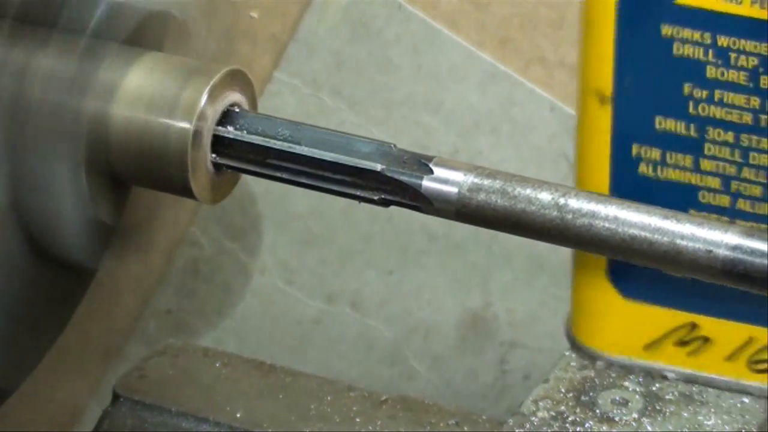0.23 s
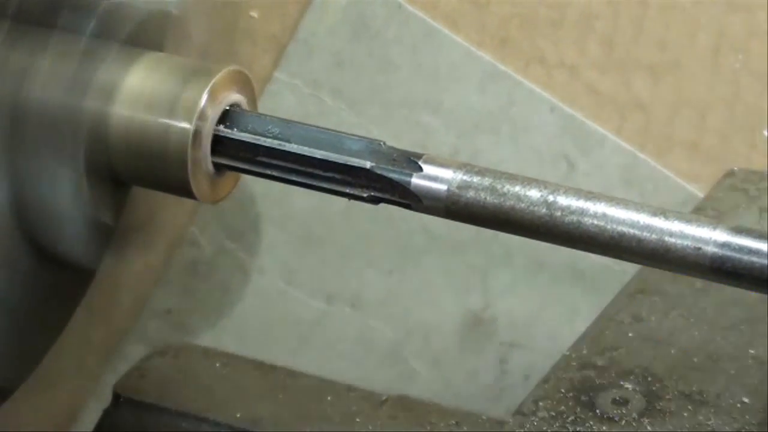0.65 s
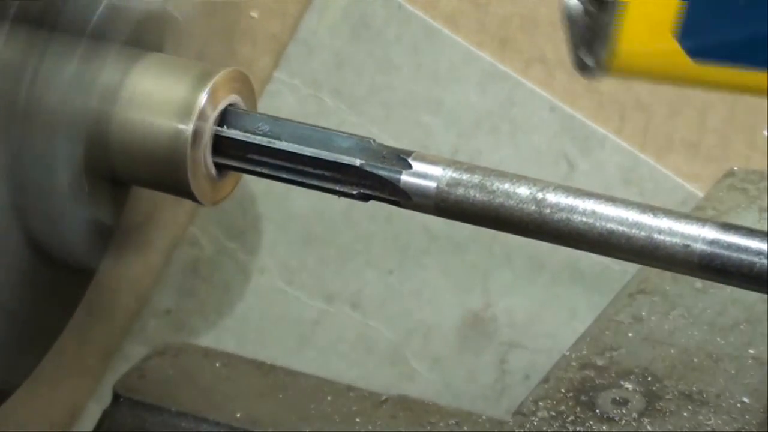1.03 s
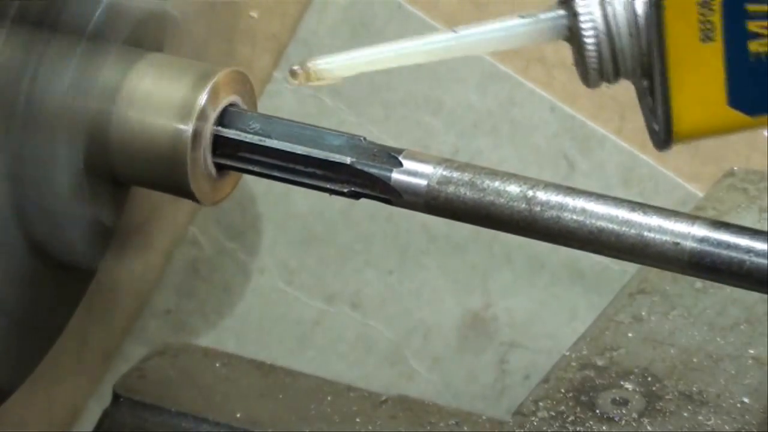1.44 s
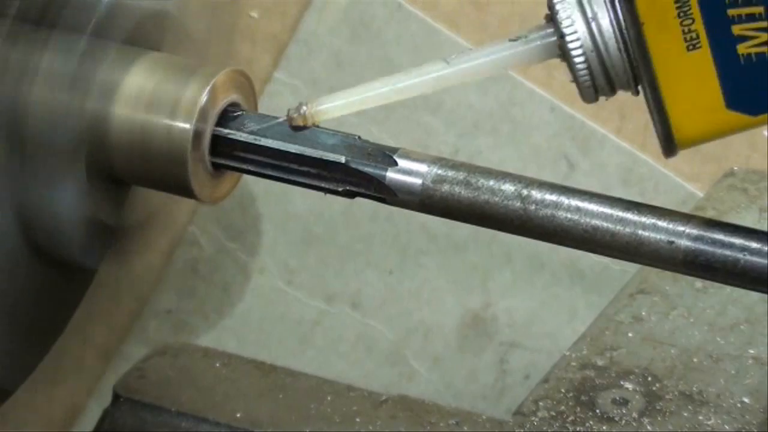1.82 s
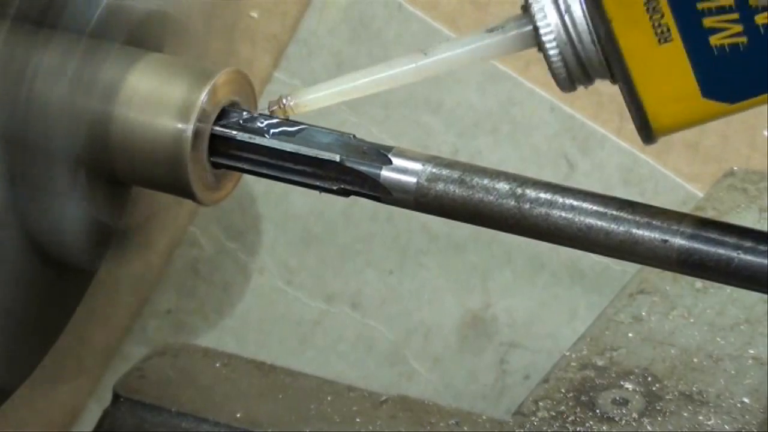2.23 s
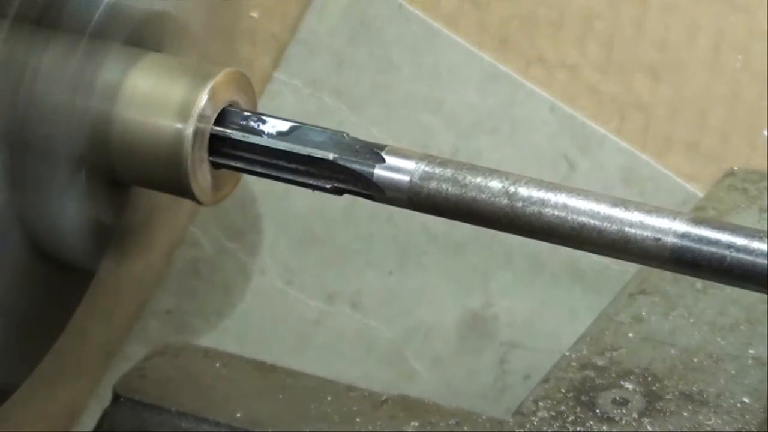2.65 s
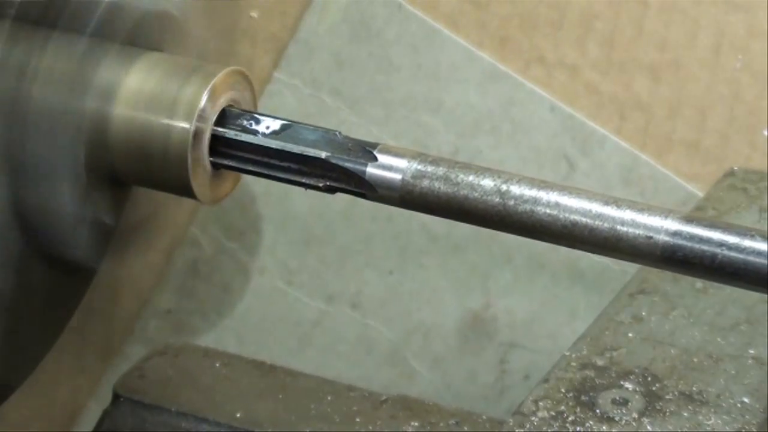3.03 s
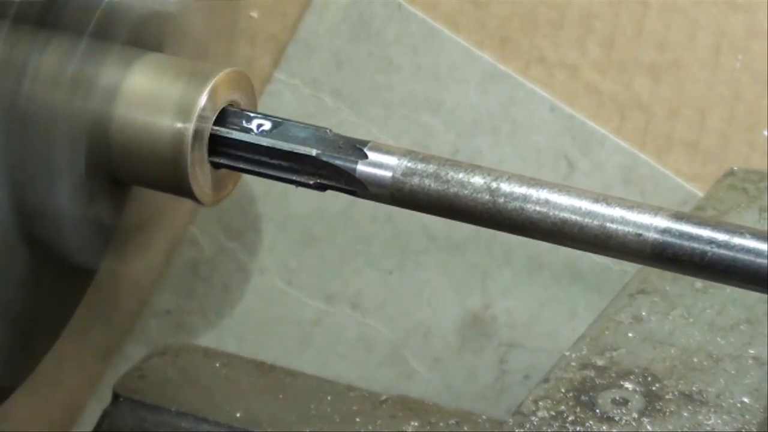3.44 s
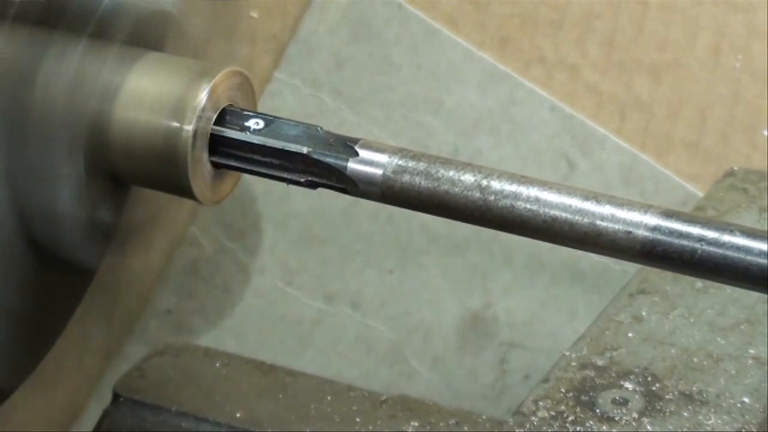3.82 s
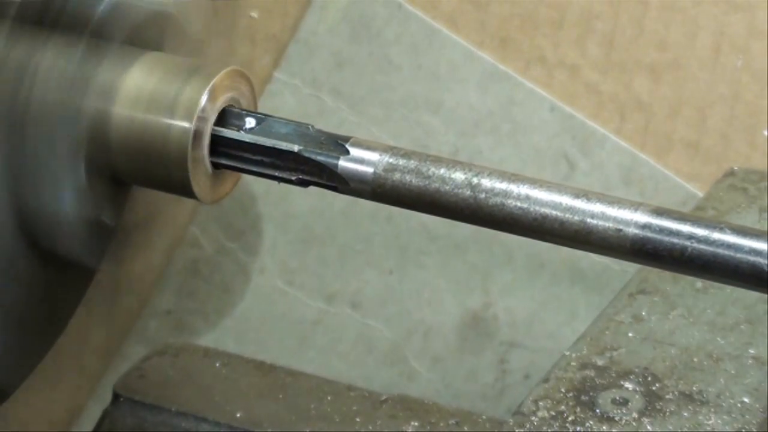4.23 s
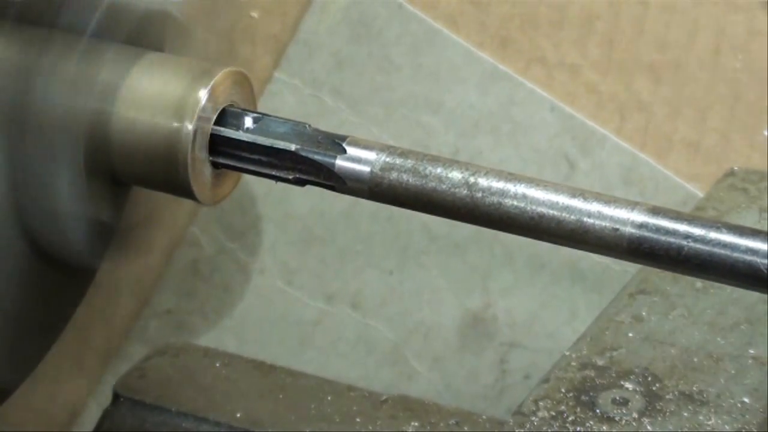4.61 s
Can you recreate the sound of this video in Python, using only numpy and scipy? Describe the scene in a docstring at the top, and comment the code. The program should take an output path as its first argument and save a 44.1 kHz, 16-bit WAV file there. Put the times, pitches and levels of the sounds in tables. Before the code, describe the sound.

Steady lathe hum and soft high scraping open the scene, with one small metal tick just before the cut. The reamer suddenly grips the brass and shrieks, a gritty whistle near four kilohertz with bright overtones and hissing friction. It falters and relocks repeatedly, fluttering with the rotation. Close stereo microphone, short dull room tail, motor slightly left, and the hum ducks beneath the squeal.

```python
"""In a workshop a lathe hums; a fluted reamer, at first only brushing a spinning brass bushing, bites and chatters.
The drive is a sum of gear tones, mains hum and shaped noise; load slows its shaft a little.
The scrape is friction noise exciting the modes of tool and bushing; a small metal tick is a few decaying modes.
The chatter is a self-excited rough tone near 4 kHz with two overtones; it sinks as the tool goes deeper.
A short room tail follows every sound, and the recorder turns its gain down as the sound grows."""
import sys
import numpy as np
from scipy import signal
from scipy.fft import rfft, irfft
from scipy.io import wavfile
from scipy.ndimage import uniform_filter1d

SR = 44100
rng = np.random.default_rng(int(sys.argv[2]) if len(sys.argv) > 2 else 0)


def waveform_to_disk(signal):
    """Save audio, clipped to [-1, 1], as 16-bit WAV at the path in sys.argv[1]."""
    frames = np.transpose(np.atleast_2d(signal))
    scaled = np.clip(frames, -1, 1) * 32767
    samples = np.round(scaled).astype(np.int16)
    wavfile.write(sys.argv[1], SR, samples)


def decibels_to_gain(level_db):
    """Convert a level in decibels to a linear amplitude gain (20 dB per decade)."""
    exponent = np.asarray(level_db, float) / 20
    return 10 ** exponent


N = 214712   # length [samples]
BITE_S = 1.386


def seconds():
    """Uniform sampling: the time of every sample in seconds."""
    return np.arange(N) / SR


def rms_one(x):
    """Normalization: scale a signal to unit mean power."""
    return x / np.sqrt(np.mean(x ** 2) + 1e-20)


def in_time(rows):
    """Linear interpolation: the columns of a table as curves over all samples."""
    times, *columns = np.transpose(rows)
    return [np.interp(seconds(), times, column) for column in columns]


def at_hz(points, hz):
    """Logarithmic frequency scale: a spectrum is interpolated along it."""
    hz_of, value = np.transpose(points)
    return np.interp(np.log(hz + 1), np.log(hz_of + 1), value)


def drift(rate_hz):
    """Low-passed random process: noise twice through a one-pole filter, run in for a second, unit rms."""
    r = np.exp(-2 * np.pi * rate_hz / SR)
    slow = signal.lfilter([1], [1, -2 * r, r * r], rng.standard_normal(N + SR))
    return rms_one(slow[SR:])


def resonate(x, hz, width_hz):
    """Resonance: a damped two-pole oscillator with unit gain at its peak."""
    r = np.exp(-np.pi * width_hz / SR)
    poles = [1, -2 * r * np.cos(2 * np.pi * hz / SR), r * r]
    return signal.lfilter([(1 - r * r) / 2, 0, (r * r - 1) / 2], poles, x)


def since_bite():
    """Origin of time for the cut: seconds since the reamer bit, zero before."""
    return np.maximum(seconds() - BITE_S, 0)


def engaged(takes_s=0.026):
    """Onset of contact: 0 while the flutes brush the bore, 1 once they cut."""
    return np.clip((seconds() - BITE_S) / takes_s + 1, 0, 1)


def by_spell(values, between):
    """Mode locking: one value in each spell, another between them, blended over the locking time."""
    lock_s = 0.04
    out = np.full(N, float(between))
    for (start, end, *_), value in zip(SPELLS, values):
        out[int(start * SR):int(end * SR)] = value
    return uniform_filter1d(out, int(lock_s * SR))


def last_squeal():
    """Relaxation: time since the last squeal began, in settling times; negative before."""
    settles_s = 0.32
    return (seconds() - SPELLS[-1][0]) / settles_s


# gear and belt tones as multiples of the shaft speed; whole multiples add up to one knock a turn
GEAR_MULTIPLES = [10, 15, 16.8, 20, 23.2, 25.33, 28.35, 28, 30, 30.5, 39, 46.7, 50, 53, 54, 55, 56, 57, 58,
                  59, 60, 63.3, 77, 106, 115, 116, 148.6]
# level of each gear tone while the lathe idles: (level [dB])
GEARS_IDLE_DB = [-46, -44, -40.5, -42.5, -38, -32, -26.5, -38, -41, -28, -35.5, -53, -57, -31, -31.5, -33,
                 -32, -37, -29, -31.5, -54, -51, -34.5, -38.5, -46, -36.5, -38]
# level of each gear tone under load: (level [dB])
GEARS_LOADED_DB = [-45.5, -44, -46, -40.5, -38, -47, -43.5, -45, -31.5, -34, -34, -74, -80, -33, -52, -26,
                   -36, -30, -32, -31.5, -34.5, -52, -33.5, -37, -76, -44, -38]
# motor hum: (frequency [Hz], level [dB])
MAINS_HUM = [(120, -36), (240, -33)]
# spectral shape of the drive noise: (frequency [Hz], relative density [dB per Hz])
RUMBLE_SHAPE = [(24, -68), (40, -35.5), (101, -22.5), (166, -13.5), (241, 2), (325, -10), (509, -4.5),
                (606, -8.5), (881, -14), (1050, -10), (1220, -15), (1860, -13.5), (5170, -28.5),
                (8110, -25.5), (15500, -90)]
# level difference of the drive: (frequency [Hz], left over right [dB])
DRIVE_BALANCE = [(60, 2), (180, 1.5), (550, 3.5), (1650, 1.5), (4970, 2.5), (15000, -1)]
# phase difference of the drive: (frequency [Hz], left lead [rad])
DRIVE_LEAD = [(0, 0), (520, 0.4), (1380, 0.27), (2930, 0.00033), (8440, 0.45), (15400, -0.0)]


def drive(load, waver_db=2.0, patchy_db=0.5, knock_at_turn=.62):
    """Harmonic synthesis: gear tones slow under load, mains hum stays, bearing and belt noise lies under them."""
    idle_hz, loaded_hz = 9.014, 8.964   # shaft speed
    noise_db = -19
    turns = np.cumsum(idle_hz + load * (loaded_hz - idle_hz)) / SR - knock_at_turn
    wavers = [drift(3.5) for _ in range(4)]   # shared among the gear tones
    tones = 0
    for k, (multiple, idle_db, loaded_db) in enumerate(zip(GEAR_MULTIPLES, GEARS_IDLE_DB, GEARS_LOADED_DB)):
        level_db = idle_db + load * (loaded_db - idle_db) + waver_db * wavers[k % 4]
        phase = 2 * np.pi * multiple * turns + 0.66 * wavers[k % 3 + 1]
        tones = tones + decibels_to_gain(level_db) * np.cos(phase)
    for hum_hz, hum_db in MAINS_HUM:
        tones = tones + decibels_to_gain(hum_db) * np.sin(2 * np.pi * hum_hz * seconds())
    hz = np.arange(N // 2 + 1) * SR / N
    noise = irfft(rfft(rng.standard_normal(N)) * decibels_to_gain(at_hz(RUMBLE_SHAPE, hz)), N)
    noise = decibels_to_gain(noise_db + patchy_db * drift(8.0)) * rms_one(noise)
    spectrum = rfft(np.sqrt(2) * tones + noise)
    # the headstock stands to the left
    to_left = decibels_to_gain(at_hz(DRIVE_BALANCE, hz) / 2) * np.exp(.5j * at_hz(DRIVE_LEAD, hz))
    return irfft(np.array([spectrum * to_left, spectrum / to_left]), N)


# the bore is out of round, the grip swings: (times per turn, depth [0-1], phase [rad])
RUNOUT = [(2, 0.02, 2), (3, 0.08, -1.05), (6, 0.09, 1), (7, 0.07, 0.6), (9, 0.05, -1), (10, 0.02, 0.48)]


def grip():
    """Periodic modulation: the cutting force swings with the angle of the spindle."""
    spindle_hz = 9.19
    angle = 2 * np.pi * spindle_hz * seconds()
    return 1 + sum(depth * np.cos(times * angle + phase) for times, depth, phase in RUNOUT)


# modes of tool and bushing: (frequency [Hz], width [Hz], relative level brushing [dB], and cutting [dB])
TOOL_MODES = [(2070, 80, -10, -16), (2670, 80, -10, -11), (2845, 60, -12, -12), (3240, 140, -10, -11),
              (3550, 500, -14, -13), (3785, 45, -10, 1.5), (4150, 200, -8, -2), (5630, 130, -15, -7),
              (5880, 100, -20, -16), (6920, 120, 0, 0), (7200, 250, -6, -7), (7530, 200, -6, -4),
              (7950, 300, -12, -5), (8380, 250, -3, -5), (8800, 200, -14, -3), (9140, 90, -18, 0),
              (9480, 250, -12, -2), (9800, 300, 0, -1), (10550, 300, -3, -13), (10950, 250, -5, -5),
              (11300, 350, 0, 0), (12250, 500, -12, -6), (12900, 250, -14, -12), (13550, 110, -18, -11),
              (13980, 260, -16, -7), (14600, 300, -15, -22), (15650, 200, -17, -20)]
# bands that gather the modes into six groups: (low edge [Hz], high edge [Hz])
GROUP_EDGES = ((900, 4750), (5250, 6150), (6780, 8700), (8700, 10050), (10300, 13250), (13300, 17000))
# the groups, low to high: (level brushing [dB], level cutting [dB], share of pressure [dB per dB],
# gain in a spell [dB], gain with depth [dB per s], gain once the last squeal has settled [dB])
GROUP_RESPONSE = [(-38, -23.5, 0.83, -1.5, 1.43, -6), (-45, -33.5, 0.51, -0.1, 0.14, -4),
                  (-40.5, -24.5, 1.74, 2, 0.4, 2), (-43, -25, 0.94, 4, -2, -5),
                  (-47.5, -37, 1.4, 5, 0.7, 4), (-56, -44.5, 1.2, 5.5, -2, 0)]
# pressure of the flutes on the bore: (time [s], level [dB])
PRESSURE = [(0, 1.5), (.3, 1.5), (.8, 0.5), (1.3, -4), (1.45, 1.5), (1.65, 1), (2.0, 0), (2.25, -2.5),
            (2.5, -1.5), (2.8, -1.5), (3.0, 2), (3.5, 1), (3.9, 0.5), (4.3, -1), (4.55, -0.5), (4.68, -1),
            (4.87, -12)]


def scrape(force, load, grain_db=3.0, clump_db=1.0):
    """Forced vibration: uneven friction grains ring the modes; groups answer pressure, squeal and depth apart."""
    unevenness_db = grain_db * drift(800) + 0.9 * drift(36)
    grains = rng.standard_normal((2, N)) * decibels_to_gain(unevenness_db) * force ** 1.26
    pressure_db, = in_time(PRESSURE)
    locked, cut = by_spell(np.ones(len(SPELLS)), 0), engaged()
    settled = np.clip(last_squeal(), 0, 1)
    out = 0
    for response, (low, high) in zip(GROUP_RESPONSE, GROUP_EDGES):
        idle_db, cutting_db, share, spell_db, depth_db, last_db = response
        modes = [mode for mode in TOOL_MODES if low <= mode[0] < high]
        rung = 0
        for k, (hz, width_hz, brush_db, cut_db) in enumerate(modes):
            mode_gain = decibels_to_gain(brush_db + load * (cut_db - brush_db))
            rung = rung + mode_gain * resonate(grains[k % 2], hz, width_hz)   # neighbours get other grains
        # dark valleys between the groups
        rung = signal.sosfilt(signal.butter(3, [low, high], "band", fs=SR, output="sos"), rung)
        gained_db = cutting_db - idle_db + spell_db * locked + depth_db * since_bite() + last_db * settled
        level_db = idle_db + cut * gained_db + share * pressure_db
        out = out + decibels_to_gain(level_db + 2.0 + clump_db * drift(39)) * rms_one(rung)
    return out


# a small metal tick: (time [s], level of its main mode [dB], frequency [Hz], 60 dB decay [s])
TICK = [(0.9374, -9, 6650, 0.022)]


def tick():
    """Free vibration: a short bright tap on thin sheet metal excites a few close modes that die away."""
    modes = ((.8, -11), (.93, -6), (1, -2), (1.13, -8))   # (frequency ratio, level [dB])
    out = 0
    for start, db, hz, t60 in TICK:
        age = np.maximum(seconds() - start, 0)
        ring = sum(decibels_to_gain(mode_db) * np.sin(2 * np.pi * ratio * hz * age) for ratio, mode_db in modes)
        attack = np.minimum(age / 0.0009, 1)
        out = out + decibels_to_gain(db - 60 * age / t60) * attack * ring
    return out


def pitch():
    """Frequency of a self-excited mode [Hz]: settles after the bite, sinks with depth, slips once to a lower mode."""
    settled_hz, bite_excess_hz, settle_s, sink_hz_per_s = 4225, 105, .19, 44
    stall_s, stall_takes_s = 3.4, .6   # the feed pauses, the pitch holds
    slip_s, slip_takes_s, slip_hz = 4.0, .09, -80
    fed_s = since_bite() - np.clip(seconds() - stall_s, 0, stall_takes_s)
    slip = np.clip((seconds() - slip_s) / slip_takes_s, 0, 1)
    excess_hz = bite_excess_hz * np.exp(-since_bite() / settle_s)
    return settled_hz + excess_hz - sink_hz_per_s * fed_s + slip_hz * slip


def side_tone():
    """Narrow-band modulation: a rough tone above each overtone of the last squeal, fading as it settles."""
    above_hz, width_hz, start_db, fade_db = 740, 86, -12, -4
    rough_swing = drift(width_hz) + 1j * drift(width_hz)
    shifted = rough_swing * np.exp(2j * np.pi * above_hz * seconds())
    fading = decibels_to_gain(start_db + fade_db * np.maximum(last_squeal(), 0) ** 2)
    return shifted * fading * (last_squeal() > 0)


# spells in which the chatter locks into a clear squeal:
# (start [s], end [s], tone level [dB], second partial level [dB], roughness [0-1])
SPELLS = [(1.377, 2.352, -9, -17, 0.21), (2.58, 2.675, -11, -12, .3), (2.695, 2.778, -11, -18, 0.31),
          (2.849, 3.096, -13, -14.5, 0.39), (3.129, 3.618, -11, -14, 0.27), (3.708, 3.74, -10, -22, 0.4),
          (3.80, 3.871, -12.5, -17, 0.4), (3.911, 3.98, -10, -14.5, 0.32), (4.064, 4.297, -13.5, -21, 0.41),
          (4.384, 4.896, -10, -9.5, 0.27)]


def chatter(force, wander_hz=9, wander_rate_hz=70, stray_hz=70, stray_rate_hz=14, flutter_db=1.0):
    """Self-excited oscillation: where it is rough it breaks into bursts and narrow noise replaces the clean tone."""
    falter_tone_db, falter_second_db, falter_rough = -18.5, -48, 0.41   # between the spells
    build_up_s, tone_lag_db, overtone_lag_db = 0.11, -4, -39   # the swing grows, the overtones later
    _, _, tone_db, second_db, rough = np.transpose(SPELLS)
    young = np.exp(-since_bite() / build_up_s)
    first = by_spell(tone_db, falter_tone_db) + tone_lag_db * young
    second = by_spell(second_db, falter_second_db) + overtone_lag_db * young
    levels_db = first, second, second - 12.5
    rough = by_spell(rough, falter_rough)
    wander = wander_hz * drift(wander_rate_hz)
    stray = stray_hz * rough ** 2 * drift(stray_rate_hz)
    phase = 2 * np.pi * np.cumsum(pitch() + wander + stray) / SR
    side = side_tone()
    bursts_db = 12 * rough * (np.tanh(1.3 * drift(32)) - .4)   # saturates upward, mostly drops out
    slip_rates_hz, noisiness, steepness = (85, 160, 120), (1.9, 1.6, .8), (.9, 1.5, 1.9)
    out = 0
    for k, (db, rate_hz, noisy, steep) in enumerate(zip(levels_db, slip_rates_hz, noisiness, steepness), start=1):
        noise_share = np.clip(noisy * rough, 0, 1)
        slips = (drift(rate_hz) + 1j * drift(rate_hz)) / np.sqrt(2)
        clean = np.sqrt(1 - noise_share) * decibels_to_gain(flutter_db * drift(25))
        swing = clean + np.sqrt(noise_share) * slips + side * (k > 1)
        partial = np.real(swing * np.exp(1j * k * phase))
        out = out + np.sqrt(2) * decibels_to_gain(db + steep * bursts_db) * partial   # overtones feel a burst more
    return out * engaged() * force ** (0.23 + 0.51 * np.clip(rough, 0, 1))


def workshop(x):
    """Reverberation: a dull, exponentially dying noise tail, another one for each side."""
    t60_s, room_db = 0.12, -16.5
    age = np.arange(SR // 2) / SR
    tail = rng.standard_normal((2, len(age))) * decibels_to_gain(-60 * age / t60_s) * (age > .004)
    tail = signal.sosfilt(signal.butter(1, [450, 7000], "band", fs=SR, output="sos"), tail)
    tail = tail / np.sqrt(np.sum(tail ** 2) / 2)
    return decibels_to_gain(room_db) * signal.fftconvolve(x, tail, axes=1)[:, :N]


def scene():
    """Superposition: drive, tool and tick add up, and the room answers them."""
    force = grip()
    load = np.clip(since_bite() / .1, 0, 1)
    tool = chatter(force) + scrape(force, load)
    dry = drive(load) + tool * decibels_to_gain(np.array([[-.3], [.3]])) + tick()   # the tool sits slightly right
    return dry + workshop(dry)


def band_limit(x):
    """A steep low-pass at the top of the band."""
    return signal.sosfilt(signal.butter(12, 15900, fs=SR, output="sos"), x)


def record(dry, threshold_db=-16.0, squeeze=0.76, follow_s=0.01, stereo_top_hz=9900):
    """Dynamic compression: gain follows smoothed power and takes back most of a rise; the top treble is mono."""
    r = np.exp(-1 / (follow_s * SR))
    power = np.mean(dry ** 2, axis=0)
    power = signal.lfilter([1 - r], [1, -r], power, zi=[np.mean(power[:SR // 4])])[0]
    over_db = np.maximum(10 * np.log10(power) - threshold_db, 0)
    limited = np.tanh(dry * decibels_to_gain(-squeeze * over_db))
    bass_cut = signal.butter(2, 42, "high", fs=SR, output="sos")
    left, right = signal.sosfilt(bass_cut, limited)
    hz = np.arange(N // 2 + 1) * SR / N
    side = irfft(rfft(left - right) * (hz < stereo_top_hz), N)
    mix = np.array([left + right + side, left + right - side]) / 2
    return band_limit(mix)


dry = scene()
out = record(dry)
waveform_to_disk(out)
```